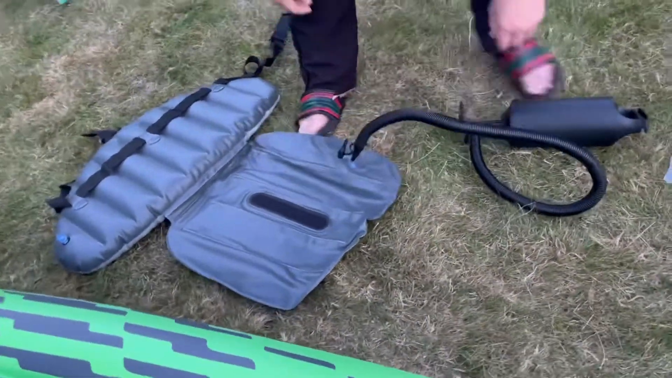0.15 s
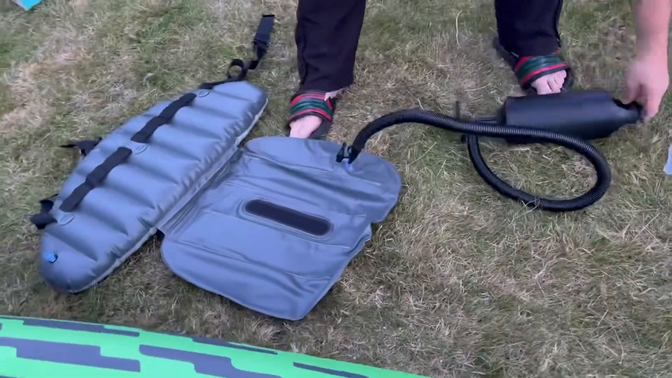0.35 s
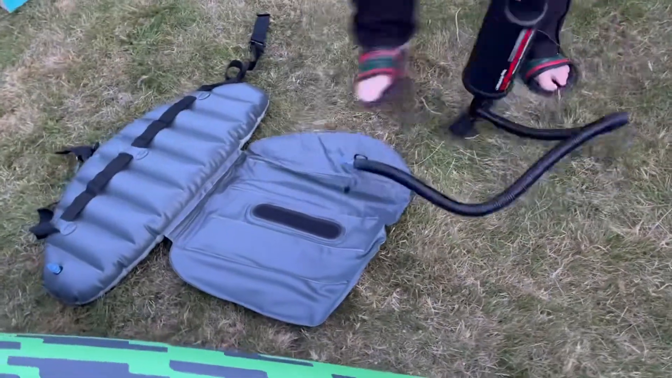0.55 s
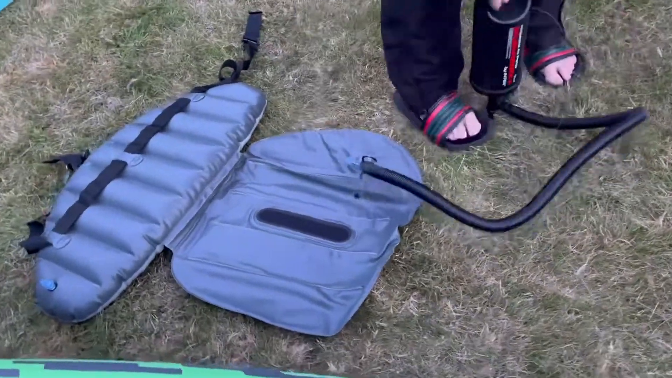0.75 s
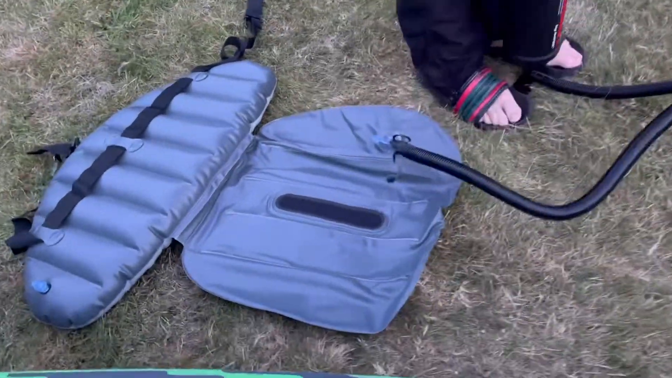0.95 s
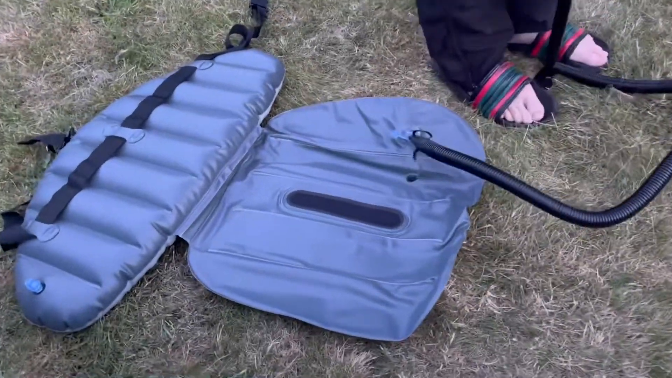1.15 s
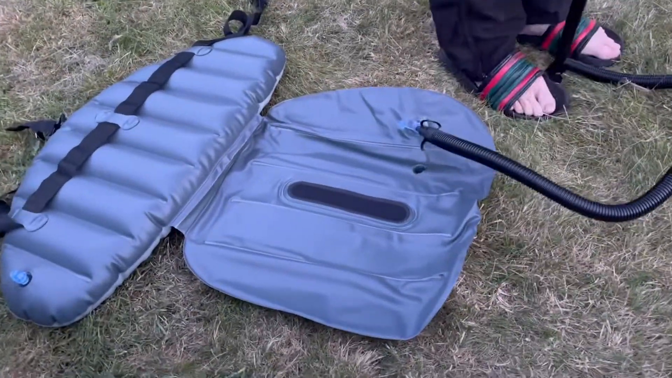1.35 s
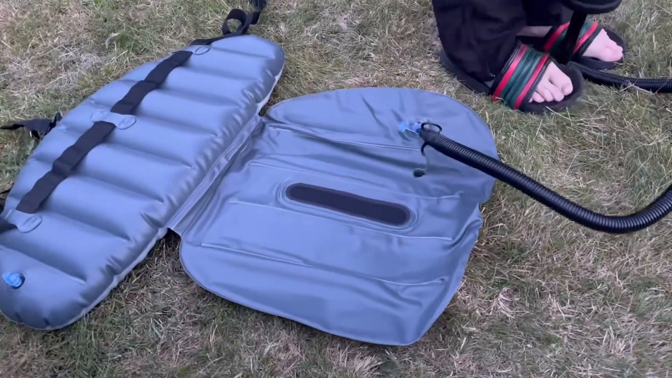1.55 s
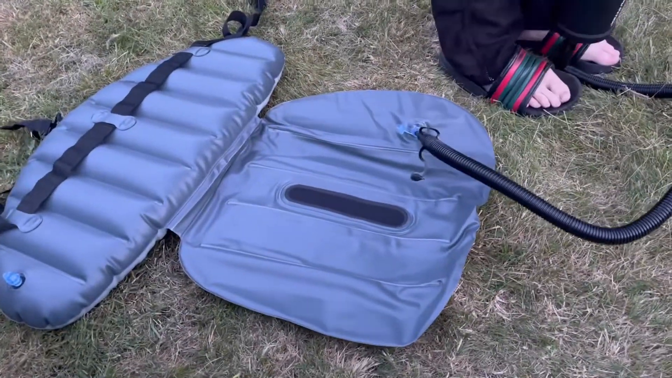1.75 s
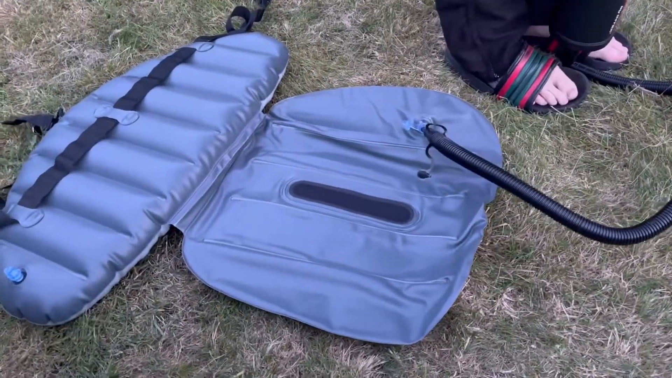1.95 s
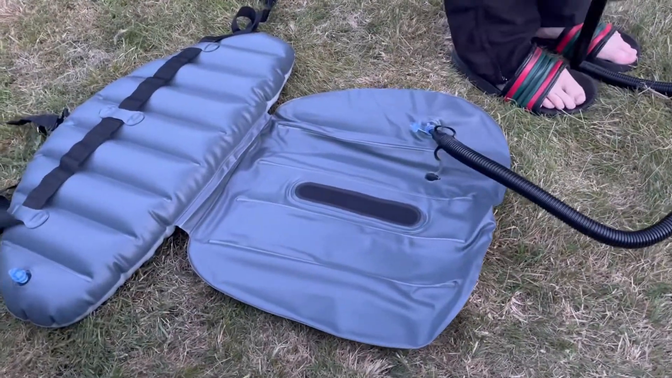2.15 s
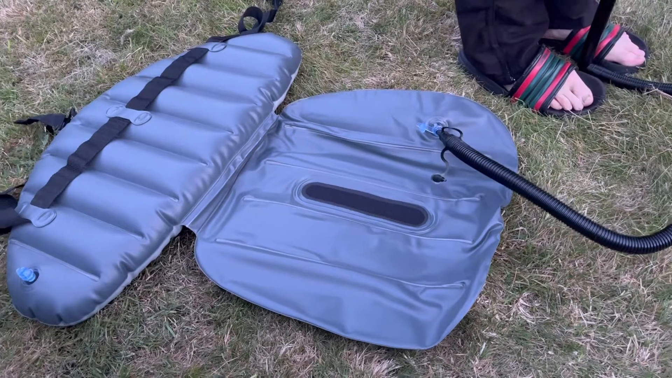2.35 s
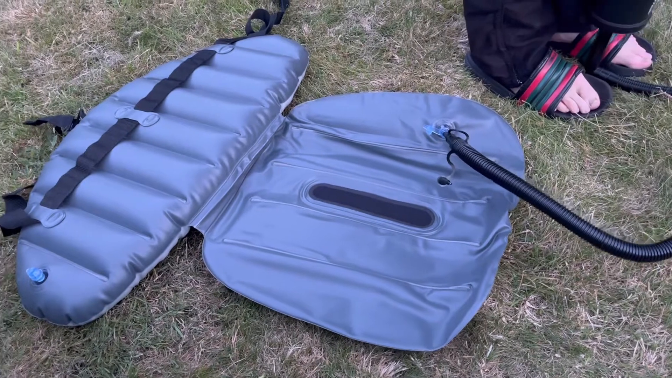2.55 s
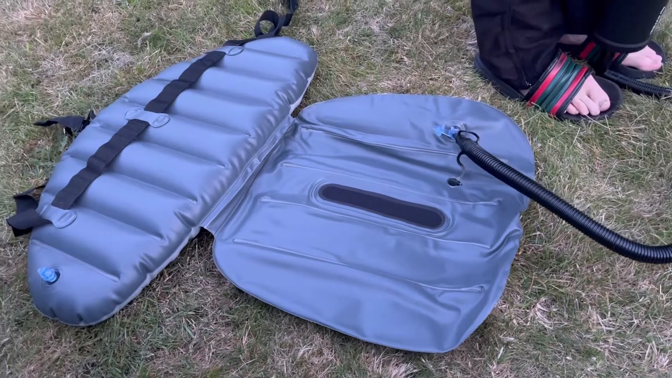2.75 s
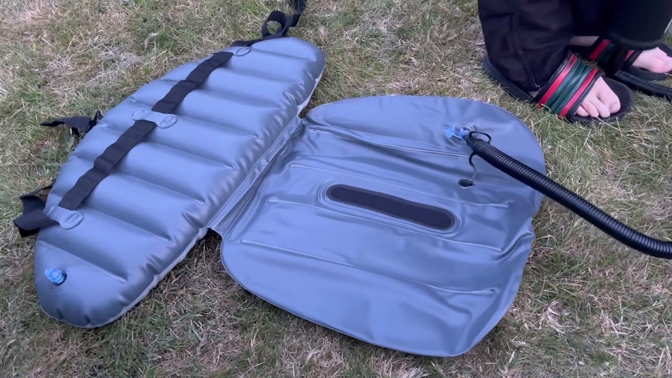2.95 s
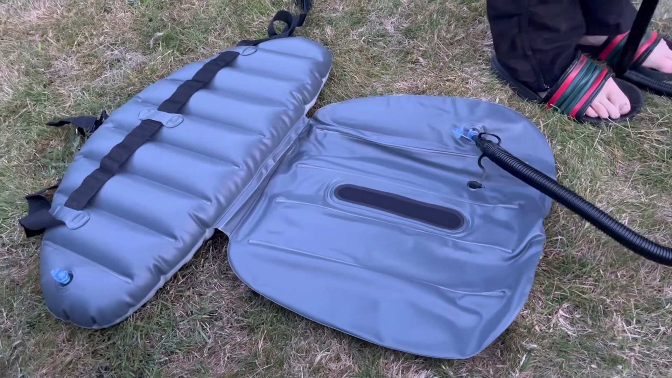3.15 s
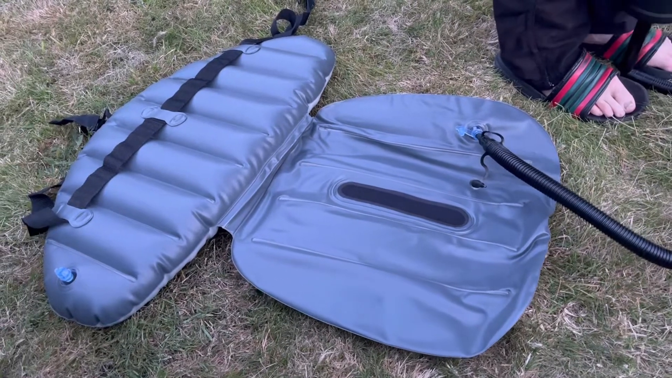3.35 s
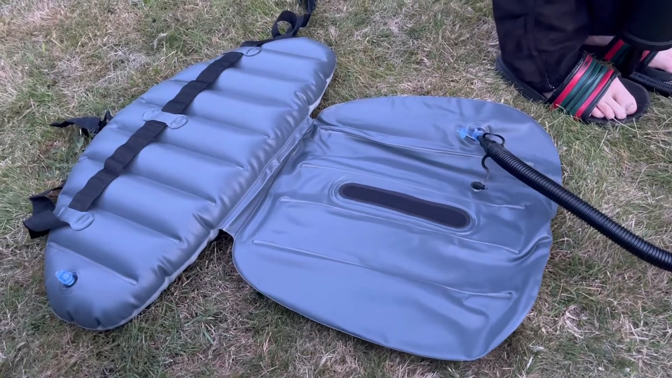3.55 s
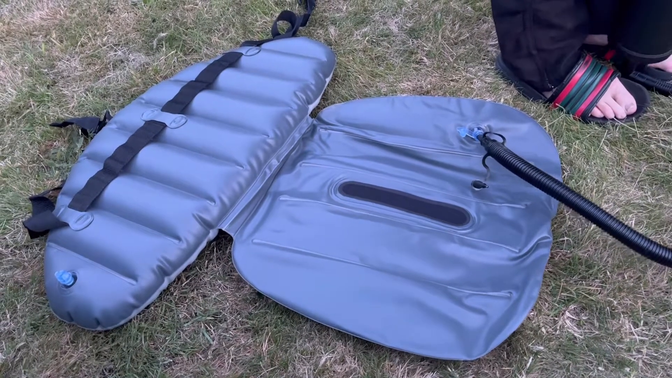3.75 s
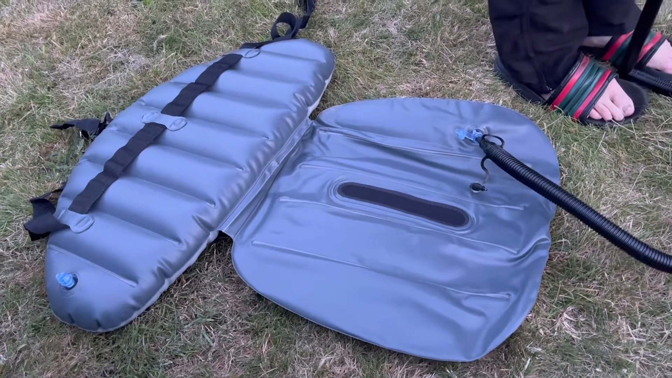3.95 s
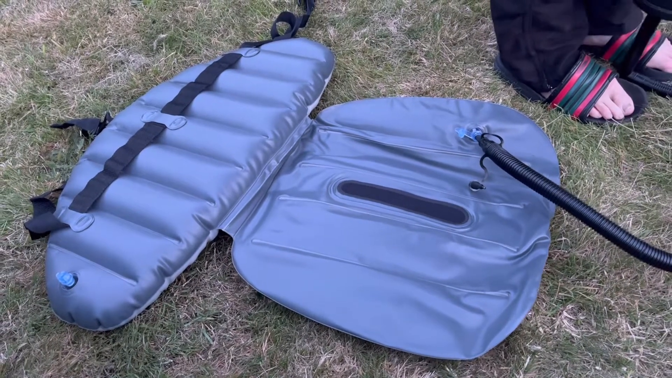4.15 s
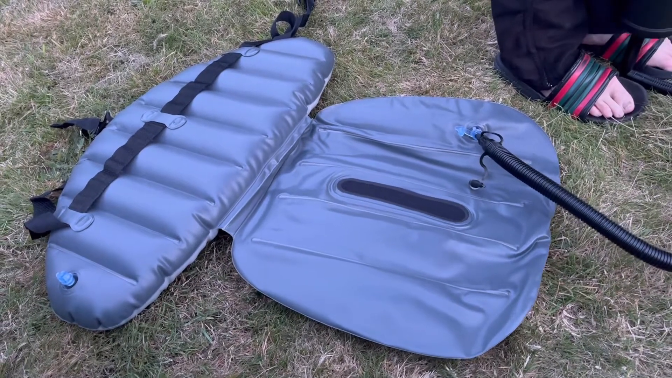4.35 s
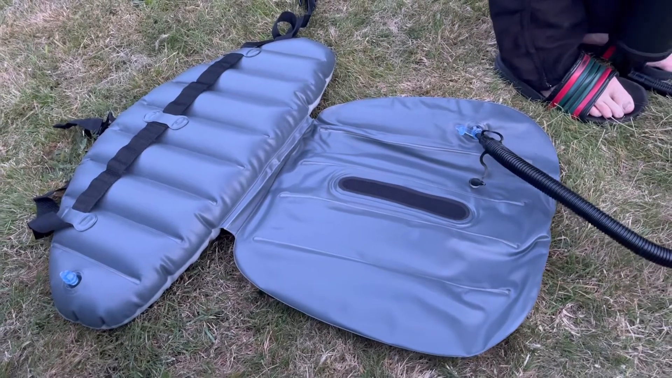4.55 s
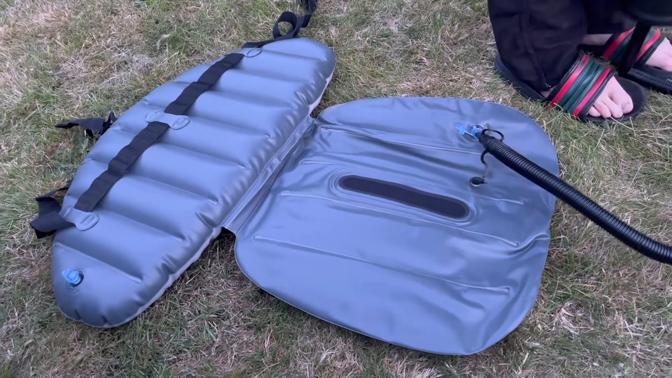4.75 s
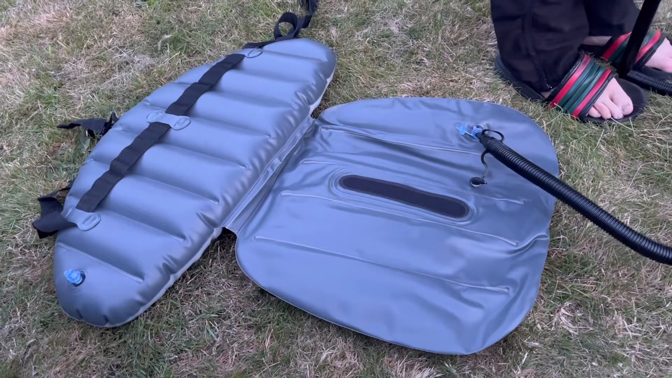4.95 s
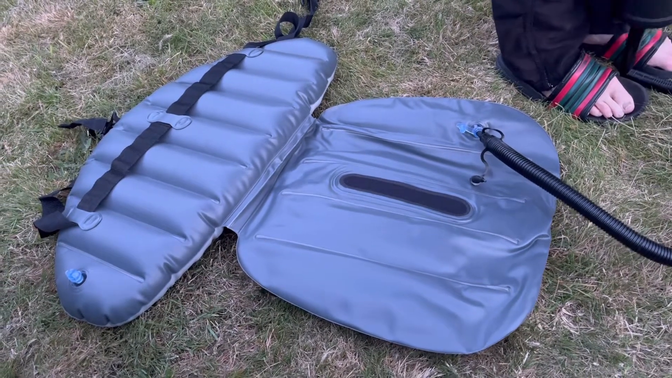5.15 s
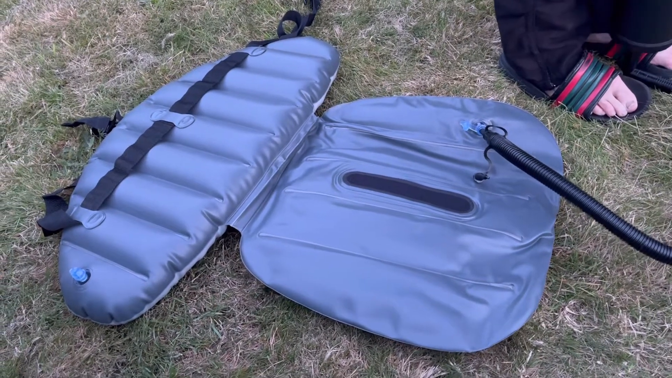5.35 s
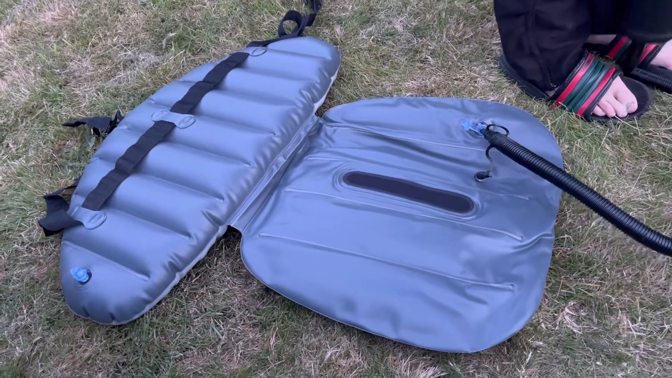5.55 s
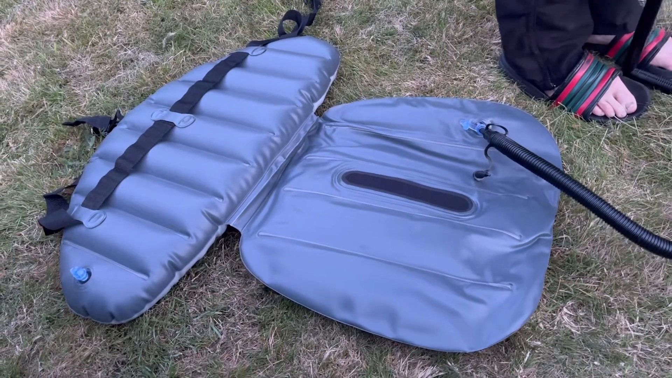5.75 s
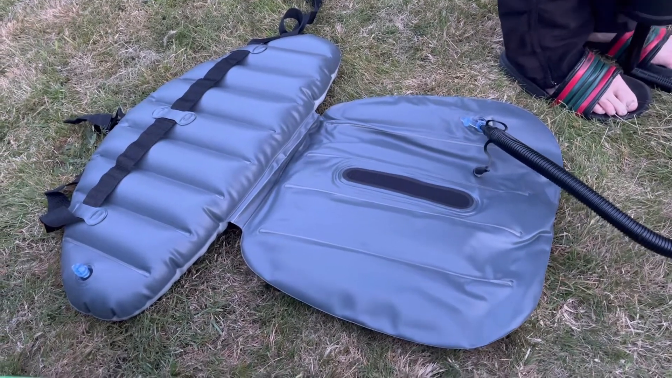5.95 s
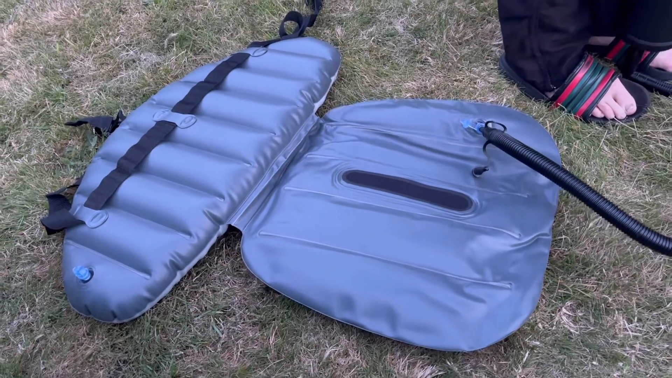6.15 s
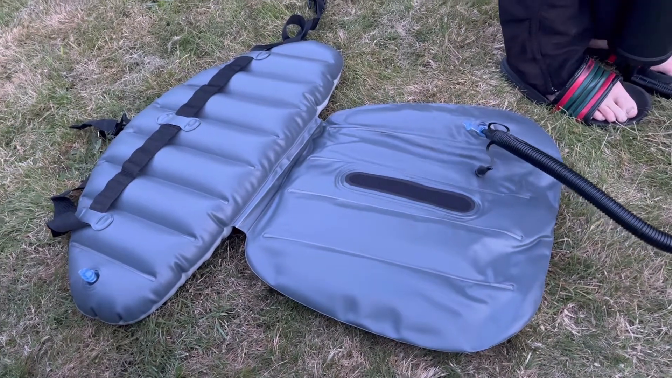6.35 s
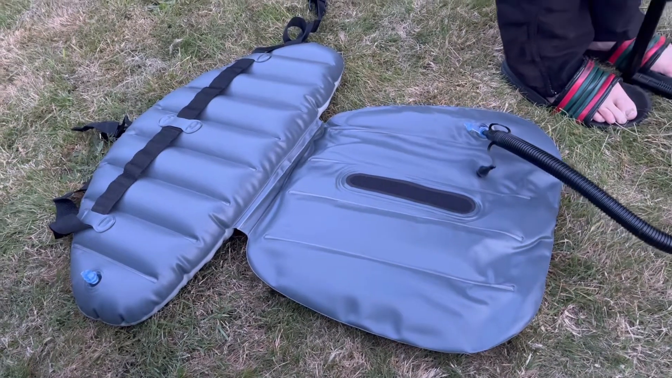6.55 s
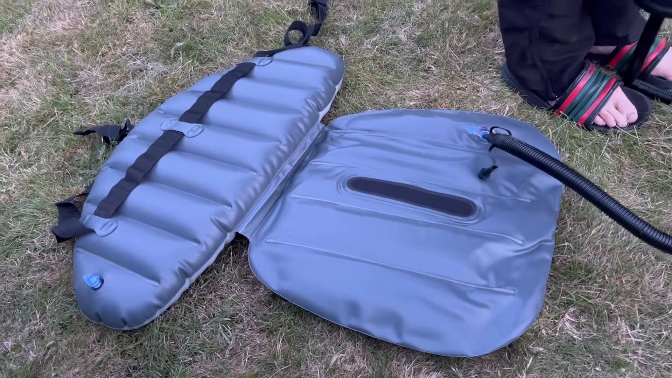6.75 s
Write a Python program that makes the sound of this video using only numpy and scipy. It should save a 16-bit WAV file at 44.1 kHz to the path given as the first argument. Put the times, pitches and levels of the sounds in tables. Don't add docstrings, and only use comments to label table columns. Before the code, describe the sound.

Outdoors on grass, a hand pump is picked up and set down with dry rustles, scuffs and hollow plastic taps. Then seven strokes follow, each a sharp valve click, a brief raspy suck of air, a knock, and a longer resonant hiss down a ribbed hose into an inflatable seat. Close microphone, with light low wind bumps and faint distant traffic.

```python
import sys
import numpy as np
from scipy import signal
from scipy.fft import rfft, irfft, next_fast_len
from scipy.io import wavfile
from scipy.ndimage import uniform_filter1d

SR = 44100
rng = np.random.default_rng(int(sys.argv[2]) if len(sys.argv) > 2 else 0)


def gain_from_decibels(decibels):
    exponent = np.asarray(decibels, float) / 20
    return 10 ** exponent


def waveform_to_disk(signal):
    frames = np.transpose(np.atleast_2d(signal))
    scaled = np.clip(frames, -1, 1) * 32767
    samples = np.round(scaled).astype(np.int16)
    wavfile.write(sys.argv[1], SR, samples)


N = 300321

# time_s, level_db, tilt_db_per_octave
GUSTS = [(0.0, -58, 2), (0.51, -55, 1.5), (1.5, -55.5, 3), (2.16, -53.5, 1.5), (2.5, -57.5, 2),
         (3.28, -54, 1), (3.57, -54, -2), (4.14, -52, 5), (4.28, -62, 0), (4.4, -62, -4), (4.59, -60, 2.5),
         (4.95, -49.5, 2.5), (5.37, -54.5, 2), (5.67, -51, -2), (5.92, -53.5, 1), (6.2, -52.5, -8),
         (6.81, -49.5, -7)]
# frequency_hz, density_db_per_hz
WIND_SPECTRUM = [(15, -61), (25, -16), (75, -5), (118, 3.5), (175, -6), (295, -17), (389, -49), (409, -44),
                 (500, -43), (650, -34), (1100, -120)]
# frequency_hz, density_db_per_hz
WASH_SPECTRUM = [(120, -31), (200, 4.5), (500, -11), (800, -8), (1200, -8.5), (1700, -13.5), (2600, -17),
                 (3300, -22), (3900, -34), (7000, -39), (11000, -34), (15900, -48)]
# loudest_s, level_db, swell_db_per_s, fade_db_per_s
SCRAPES = [(0.003, -56.5, 500, 500), (0.12, -66, 202, 98), (0.175, -53, 169, 750),
           (0.235, -71, 101.5, 111.5), (0.38, -89, 150, 103.5), (0.44, -64, 201.5, 120),
           (0.516, -63.5, 112, 400), (0.585, -86, 150, 150), (0.662, -52.5, 165, 145),
           (0.73, -69, 148, 350), (0.826, -51.5, 900, 124), (0.9, -77, 95, 117)]
# frequency_hz, density_db_per_hz
GRASS_SPECTRUM = [(1500, -4), (3000, -5), (6000, -5), (9000, -3), (13000, -5), (15900, -4)]
# start_s, peak_db, pitch_hz
SNAPS = [(0.085, -51, 8000), (0.092, -51, 3500), (0.098, -50, 3500), (0.105, -50, 9000), (0.109, -47, 5350),
         (0.112, -52, 13000), (0.142, -56, 8000), (0.1693, -45, 4800), (0.169, -50, 9500),
         (0.195, -50, 7000), (0.227, -59, 5200), (0.259, -58, 13000), (0.354, -51, 2400),
         (0.515, -54, 2600), (0.405, -50, 8500), (0.519, -55, 5500), (0.582, -56, 14000),
         (0.687, -55, 5000), (0.7134, -44, 3040), (0.714, -54, 6000), (0.813, -59, 11000),
         (0.853, -51, 14000), (0.895, -45, 4250)]
# start_s, peak_db, brightness_db, t60_s
SCUFFS = [
    (0.0867, -51, -9, 0.1),
    (0.1044, -39.5, -7, 0.048),
    (0.168, -41, -5, 0.024),
    (0.1938, -48, -9, 0.0253),
    (0.3562, -46.5, -59, 0.025),
    (0.403, -53.5, -4, 0.27),
    (0.506, -45, -4, 0.062),
    (0.7114, -44.5, -11, 0.027),
    (0.818, -50, -1.5, 0.032),
    (0.8939, -40, -34, 0.022),
]
# start_s, peak_db, brightness_db, t60_s
VENTS = [(1.219, -30, -8.5, 0.024), (1.2759, -42, -31, 0.096), (2.2534, -31, -8, 0.031),
         (2.2842, -37, -32, 0.029), (3.1487, -37.5, -16, 0.015), (3.171, -43, -25, 0.037),
         (3.9695, -31.5, -12, 0.035), (4.0315, -23.5, -19, 0.013), (4.921, -36.5, -19, 0.039),
         (5.4705, -37, -10, 0.014), (5.745, -37.5, -30, 0.034), (5.757, -35.5, -22, 0.022),
         (6.352, -37, -10, 0.016), (6.6272, -32.5, -13, 0.044), (6.6753, -41.5, -28, 0.1)]
# frequency_hz, density_db_per_hz
BURST_SPECTRUM = [(700, -1.5), (1500, -3.5), (3000, -3.5), (6000, -7.5), (9000, -7.5), (15900, -3)]
# start_s, peak_db, pitch_hz
TICKS = [(0.11, -35.5, 1036), (0.353, -39, 1240), (0.514, -46.5, 420), (0.436, -45, 600), (0.675, -47, 620),
         (0.702, -41, 523), (0.895, -45.5, 457), (1.008, -33, 900), (1.02, -43, 800), (1.934, -47, 784),
         (2.283, -50, 415), (2.401, -35, 1150), (2.874, -47.5, 770), (3.693, -49, 468), (4.036, -43, 530),
         (4.692, -39, 1250), (6.628, -36, 614)]
# start_s, click_db, click_hz, barrel_db, barrel_hz
HANDLING = [
    (0.169, -53, 600, -45.5, 248),
    (0.421, -42, 790, -44.5, 358),
    (0.661, -40.5, 446, -37.5, 150),
    (0.688, -35.5, 424, -34, 215.7),
    (0.712, -58, 426, -46, 420),
]
# start_s, peak_db, pitch_hz
BOUNCES = [
    (0.699, -37, 192),
    (1.293, -37, 176),
    (2.023, -43, 342),
    (2.302, -35, 173),
    (3.991, -37, 150),
    (4.04, -33.5, 246),
    (4.07, -33, 185),
    (4.318, -41, 226),
    (5.541, -33, 168),
    (6.416, -40, 139),
]
# start_s, click_db, click_hz, barrel_db, barrel_hz
FLAPS = [
    (0.999, -30, 1330, -36, 325),
    (2.05, -32, 1260, -36, 336),
    (2.932, -27.5, 1440, -33.5, 204),
    (3.784, -29, 1350, -43, 235),
    (4.683, -32.5, 1280, -39.5, 332),
    (5.532, -30.5, 1270, -33, 189),
    (6.409, -28.5, 1065, -40, 130),
]
# start_s, click_db, click_hz, barrel_db, barrel_hz
STOPS = [(1.219, -39.5, 710, -36.5, 232), (1.282, -56, 447, -38, 333), (2.256, -34.5, 910, -30.5, 311),
         (2.4, -27, 688, -35.5, 297), (3.171, -41, 660, -33, 235), (3.226, -39, 614, -41, 248),
         (3.971, -35, 794, -32.5, 149), (4.087, -38.5, 586, -34.5, 222), (4.919, -38.5, 450, -32, 300),
         (4.96, -39, 433, -44, 325), (5.73, -37, 350, -36, 118), (5.757, -34, 680, -33, 270),
         (5.786, -41.5, 447, -44, 117), (6.635, -34.5, 343, -33, 188), (6.688, -37.5, 850, -35, 229),
         (6.722, -44, 430, -46, 156)]
# start_s, length_s, peak_flow_db, stall_s, resonance_factor
PULLS = [
    (0.999, 0.24, -47.5, 0.042, 0.95),
    (2.052, 0.2, -46, 0.024, 0.99),
    (2.93, 0.21, -45.5, 0.081, 1),
    (3.786, 0.2, -45, 0.018, 1),
    (4.682, 0.21, -45.5, 0.063, 0.99),
    (5.532, 0.21, -44.5, 0.094, 1),
    (6.406, 0.24, -45, 0.067, 0.87),
]
PULL_LEAK_DB = (-16.5, -12.5, -8.5, -5.5, -1.5)
PULL_DRIFT = (0.903, 1.0, 0.96, 0.985, 0.86)
# frequency_hz, density_db_per_hz
PULL_AIR = [(240, -21), (400, -10.5), (561, -12.5), (741, -6), (1680, -7), (3060, -7.5), (3350, -5.5),
            (4560, -5), (8580, -12.5), (15900, -7)]
# centre_hz, width_hz, lift_db
INLET_MODES = [(1384, 89, 5.5), (1760, 140, -8.5), (2850, 230, 4.5), (3210, 114, -4), (3540, 250, 6),
               (4750, 370, 4), (5000, 3100, 2), (5600, 460, 3.5), (6740, 360, -2.5), (8200, 530, 3),
               (15100, 1800, 5)]
# start_s, peak_db, brightness_db, length_s
GASPS = [
    (1.286, -44, -7, 0.081),
    (2.307, -35.5, -4.5, 0.031),
    (3.172, -40, -5, 0.045),
    (4.926, -40.5, -10, 0.0383),
    (5.761, -36, -2.5, 0.036),
    (6.691, -36, 0, 0.045),
]
# start_s, peak_flow_db, swell_s, leak_brightness_db
PUSHES = [
    (1.4, -46.5, 0.26, 1.5),
    (2.32, -48, 0.15, -8),
    (3.19, -47.5, 0.16, -6),
    (4.05, -49.5, 0.12, -8),
    (4.94, -50, 0.2, -3.5),
    (5.8, -50, 0.24, -2.5),
    (6.73, -51, 0.12, -2.5),
]
# frequency_hz, density_db_per_hz
PUSH_AIR = [(600, -22), (1000, -49), (1700, -5), (2800, -2), (5000, -3.5), (6300, -8), (9000, -9.5),
            (12000, -13), (15900, -10)]
# time_s, pitch_hz, lift_db
SEAT = [
    (1.38, 3300, 3),
    (1.5, 2800, 6),
    (1.58, 2620, 12),
    (1.75, 2370, 25),
    (1.9, 2140, 31),
    (2.0, 1980, 23),
    (2.3, 2500, 11),
    (3.7, 2500, 6.5),
    (6.81, 2470, -6),
]
# centre_hz, width_hz, lift_db
HOSE_LIMP = [(3780, 660, 11.5), (5000, 430, 6.5), (5950, 400, -2), (7100, 1500, 12), (8700, 820, 4.5),
             (10200, 500, -2), (12500, 4500, -2.5), (13800, 300, 2), (14500, 500, -8), (15400, 400, -1)]
# centre_hz, width_hz, lift_db
HOSE_FIRST = [(3500, 200, 4.5), (4530, 1700, 10), (5500, 500, 2.5), (6100, 450, -1), (7210, 620, 9.5),
              (9000, 400, -5), (11200, 900, -5), (12700, 600, 8.5), (13450, 270, -14), (14800, 300, -11),
              (15600, 500, -1)]
# centre_hz, width_hz, lift_db
HOSE_MODES = [(3060, 160, -13), (3400, 270, 0.5), (3687, 165, -21), (4270, 560, 6.5), (7660, 240, -21),
              (8065, 300, 8)]
# centre_hz, width_hz, lift_db
BENDS = [
    [(3620, 170, -2), (5000, 305, 2), (6300, 820, -5), (7600, 220, 11), (8800, 300, -6), (9900, 370, -4),
     (11500, 300, -5), (13100, 600, 9), (14050, 350, 5), (15300, 500, 2)],
    [(5000, 305, 6), (6040, 550, -6), (7400, 200, 3), (8900, 270, -4), (10200, 300, -4), (10900, 250, 5),
     (11550, 300, -6), (12200, 250, 6), (13250, 400, 8), (15300, 900, 4)],
    [(4800, 670, 2.5), (6830, 500, -5), (9150, 300, -4.5), (10050, 550, -12), (11000, 600, 4),
     (12100, 520, 6.5), (13500, 600, 4), (14800, 250, -8), (15500, 500, 6)],
    [(3680, 190, -5), (6150, 350, 1.5), (6800, 300, -1), (9900, 640, -5), (10700, 217, 11), (11840, 700, 9),
     (13500, 620, 11), (14400, 500, -2), (15300, 500, 6)],
    [(4300, 430, -1), (4780, 150, -9), (5000, 220, 2), (6230, 200, 5), (6440, 350, -4), (9800, 570, -12),
     (10400, 500, 8.5), (10700, 220, -11), (12020, 690, 10.5), (13500, 400, 11), (14700, 200, -5),
     (15300, 400, 8)],
    [(4430, 400, -7), (5000, 240, 3), (6050, 250, 3.5), (6800, 250, -3), (9500, 250, -9), (10500, 250, 7),
     (11200, 200, 4), (11900, 250, 6), (12800, 500, 7), (13250, 250, -8), (14300, 600, 6), (15300, 400, 9)],
]
# centre_hz, width_hz, lift_db
HOSE_LAST = [(2300, 710, 4), (2700, 150, -7), (3330, 200, -13), (3500, 250, 6.5), (4430, 280, 8),
             (4850, 400, -4.5), (5350, 200, 6), (5570, 160, -1), (6860, 250, -10), (7130, 180, 13.5),
             (8000, 600, 5), (9000, 250, -7), (9150, 200, 3), (9750, 300, 8), (10200, 250, -4),
             (11000, 260, 10), (13600, 1100, 10), (15800, 300, -45)]
HOSE_MOVES_S = (1.62, 2.2, 2.62, 3.0, 3.9, 4.8, 5.65, 5.975)
HOSE_DRIFT = (0.99, 1, 0.99, 0.99, 0.98, 0.98, 0.97, 1, 0.98)
HOSE_SLACK = (0.056, .001, 0.0084, .001, .01, .0087, .0088, 0.0044, .005)
HOSE_SWAY = (-.02, -.01, .02, .005, .01, 0.016, -0.0081, .001, -.0052)
HOSE_FIRM = (0.19, 0.12, .2, .1, .1, .1, .1, .1, .1)
# start_s, peak_db, pitch_hz
BUFFETS = [(2.531, -45.5, 122), (2.694, -46, 157), (3.415, -53, 140), (3.523, -44, 165), (3.56, -44.5, 120),
           (3.632, -40, 126), (3.718, -38.5, 166), (3.757, -42, 122), (3.821, -31.5, 162),
           (3.868, -52, 125), (4.105, -38, 205), (4.14, -39.5, 154), (4.205, -33.5, 150), (4.265, -42, 141),
           (5.134, -34, 157), (5.348, -48, 143), (5.606, -43.5, 112), (5.624, -42, 140), (5.659, -42, 130),
           (5.682, -38.5, 129), (5.725, -35, 124), (5.795, -48, 122), (5.855, -33.5, 180), (5.88, -40, 127),
           (6.124, -45, 132), (6.25, -41.5, 99), (6.315, -42, 132), (6.36, -41.5, 105)]
# frequency_hz, level_db
APART_HOSE = [(1500, 1.5), (2300, -23), (3000, 2), (3700, -0.5), (4200, -15.5), (6000, -15), (6500, -1),
              (9000, -7), (10000, -6), (11800, -8), (12600, -5), (15500, 0)]
# frequency_hz, level_db
APART_REST = [(60, -20.5), (250, -19), (700, -11.5), (1500, -8), (3500, -2), (4300, -11.5), (5700, -13),
              (7000, -7), (9500, -5), (15500, -2.5)]


def evened(x):
    return x / np.sqrt(np.mean(x ** 2) + 1e-20)


def read(points, hz):
    f, value = np.transpose(points)
    return np.interp(np.log(hz + 1), np.log(f + 1), value)


def add(mix, s, sound):
    part = mix[max(round(s * SR), 0):][:len(sound)]
    part += sound[:len(part)]


def above(hz, edge_hz=8500):
    return 1 / (1 + (edge_hz / (hz + 1)) ** 8)


def resonance(hz, centre_hz, width_hz):
    return 1 / (1 + (2 * (hz - centre_hz) / width_hz) ** 2)


def band_rms(x, lo_hz, hi_hz):
    power, hz = abs(rfft(x)) ** 2, np.fft.rfftfreq(len(x), 1 / SR)
    return np.sqrt(2 * power[(hz > lo_hz) & (hz < hi_hz)].sum()) / len(x)


def hiss(length, colour_db, patchy_db, ripple_db=0, size=512):
    frames, hz = 4 * length // size + 8, np.fft.rfftfreq(size, 1 / SR)[:, None]
    a, b, patches, ripples = rng.standard_normal((frames, len(hz), 4)).T
    patches = uniform_filter1d(patches, size=4, axis=0)
    patches = evened(uniform_filter1d(patches, size=12, axis=1))
    ripples = uniform_filter1d(ripples, size=3, axis=0)
    ripples = evened(uniform_filter1d(ripples, size=100, axis=1))
    level_db = colour_db(hz, np.arange(frames) * size / 4 / SR) + patchy_db * patches
    level_db = level_db + ripple_db * (0.16 + 0.75 * above(hz, 4700)) * ripples
    spectra = (a + 1j * b) * gain_from_decibels(level_db)
    return signal.istft(spectra, nperseg=size, noverlap=3 * size // 4)[1][:length]


def rings(events, rise_turns, glide, spread, low_db, high_db):
    out, t = np.zeros(N), np.arange(SR // 9) / SR
    for (s, db, hz, t60), chance in zip(events, rng.random((len(events), 4))):
        life = np.clip(t60, .003, .1)
        shape = (1 - np.exp(-(t * hz / rise_turns) ** 2)) * gain_from_decibels(-60 * t / life)
        turns = np.cumsum(hz * (1 + glide * (np.exp(-4 * t / life) - .5))) / SR
        low_turns = turns / (1 + spread * (.5 + chance[0])) + chance[2]
        high_turns = turns * (1 + spread * (.5 + chance[1])) + chance[3]
        low = gain_from_decibels(low_db) * np.sin(2 * np.pi * low_turns)
        high = gain_from_decibels(high_db) * np.sin(2 * np.pi * high_turns)
        ring = shape * (np.sin(2 * np.pi * turns) + low + high)
        add(out, s, gain_from_decibels(db) * ring / abs(ring).max())
    return out


def bursts(events, swells):
    out, t = np.zeros(N), np.arange(SR // 6) / SR
    for s, db, bright_db, lasts in events:
        def colour_db(hz, u):
            brightness = (above(hz) - 0.2 * (1 - above(hz, 2600))) * bright_db
            gap_db = swells * 6 * resonance(hz, 14000, 2300)
            return read(BURST_SPECTRUM, hz) + brightness + gap_db + 0 * u
        x = hiss(len(t), colour_db, patchy_db=1.2, size=128)
        life = max(lasts, .004)
        if swells:
            shape = np.sin(np.pi * np.minimum(t / life, 1)) ** 0.49
        else:
            shape = (1 - np.exp(-t / (0.056 * life))) * gain_from_decibels(-60 * t / life)
        x = x / band_rms(x, 2500, 8000)
        add(out, s, gain_from_decibels(db - 14.5) * x * shape / shape.max())
    return out


def stroke(rows, air, modes, usual_db, flutter_db, ripple_db, pocket, veil, stiff,
           blur=0, sway=0, waver=0, size=512):
    s, flow_db, bright_db, drift = np.transpose(rows)
    t = np.arange(s[0], s[-1], 1 / SR)
    filling, seat_hz, seat_db = np.transpose(SEAT)
    beats = np.arange(s[0], s[-1] + .2, .06)
    tremble = 1 + waver * rng.standard_normal((len(modes), len(beats)))

    def colour_db(hz, u):
        now = s[0] + u
        moved = np.clip(np.interp(now, s, drift), .8, 1.15) - 1
        along = np.clip(u / (s[-1] - s[0]), 0, 1) - .5
        lifts = 0
        for (mode_hz, width_hz, lift_db), depth in zip(modes, tremble):
            upper = above(mode_hz)
            centre_hz = mode_hz * (1 + moved * (1 - stiff * upper) - sway * along * upper)
            lifts = lifts + lift_db * np.interp(now, beats, depth) * resonance(hz, centre_hz, width_hz)
        lifts = lifts * (1 - blur * along)
        pocket_hz = np.interp(now, filling, seat_hz)
        seat = np.interp(now, filling, seat_db) * resonance(hz, pocket_hz, 600)
        seat = seat - 9 * (1 - above(hz, 0.64 * pocket_hz))
        leak_db = np.interp(now, s, bright_db) - usual_db
        leak_share = above(hz) - veil * (above(hz, 5500) - above(hz))
        return read(air, hz) + lifts + pocket * seat + leak_share * leak_db

    x = hiss(len(t), colour_db, patchy_db=1.5, ripple_db=ripple_db, size=size)
    flutter = evened(uniform_filter1d(rng.standard_normal(len(t)), size=180))
    edges = np.clip(np.minimum((t - s[0]) / 0.0034, (s[-1] - t) / 0.0031), 0, 1)
    x = x / band_rms(x, 2000, 8000)
    return s[0], x * gain_from_decibels(np.interp(t, s, flow_db) + flutter_db * flutter) * edges


def wind():
    s, level_db, tilt_db = np.transpose(GUSTS)

    def colour_db(hz, u):
        tilt = np.interp(u, s, tilt_db) * np.log2((hz + 20) / 130)
        return read(WIND_SPECTRUM, hz) - 60 * (hz > 520) + tilt
    x = evened(hiss(N, colour_db, patchy_db=2.0, size=2048))
    lumps = uniform_filter1d(rng.standard_normal(N), size=900)
    lumps = evened(uniform_filter1d(lumps, size=900))
    return x * gain_from_decibels(np.interp(np.arange(N) / SR, s, level_db) - 1.5 + 1.7 * lumps)


def wash():
    def colour_db(hz, u):
        return read(WASH_SPECTRUM, hz) - 40 * (hz < 150) + 0 * u
    return gain_from_decibels(-59.5) * evened(hiss(N, colour_db, patchy_db=2.0, size=1024))


def rustle():
    t = np.arange(SR) / SR
    level = 0
    for s, db, swell, fade in SCRAPES:
        level = level + gain_from_decibels(db - swell * np.maximum(s - t, 0) - fade * np.maximum(t - s, 0))

    def colour_db(hz, u):
        return read(GRASS_SPECTRUM, hz) - 8 * above(hz) + 0 * u
    x = hiss(len(t), colour_db, patchy_db=3.5, size=256)
    clumps = evened(uniform_filter1d(rng.standard_normal(len(t)), size=120))
    x = x / band_rms(x, 3480, 11100) * level * gain_from_decibels(-8.0 + 2.0 * clumps)
    return np.pad(x, (0, N - len(x)))


def snaps():
    ticks = [(s, db, hz, .003 + 9 / hz) for s, db, hz in SNAPS]
    return rings(ticks, rise_turns=.6, glide=0.099, spread=0.19, low_db=-14, high_db=-8)


def scuffs_and_vents():
    return bursts(SCUFFS + VENTS, swells=False)


def knocks():
    def clicks(blows):
        return [(s, db, hz, 0.0042 + 7 / hz) for s, db, hz, *_ in blows]
    rebounds = [(s + 0.00627, db - 9, hz * 0.506) for s, db, hz, *_ in FLAPS]
    barrel = [(s, db, hz) for s, _, _, db, hz in HANDLING + FLAPS + STOPS]
    thumps = [(s, db, hz, 0.038 + 2.9 / hz) for s, db, hz in barrel + BOUNCES]
    others = clicks(HANDLING + STOPS + rebounds + TICKS)
    return (rings(clicks(FLAPS), rise_turns=1.4, glide=0.26, spread=0.44, low_db=-7.0, high_db=-15)
            + rings(others, rise_turns=1.38, glide=0.33, spread=0.41, low_db=-4.0, high_db=-7)
            + rings(thumps, rise_turns=0.69, glide=0.53, spread=0.474, low_db=-5.5, high_db=-10.5))


def pull(start, length, peak_db, stall, pitch):
    rise_s, open_s, sag_db_per_s = 0.029, 0.093, 17.5
    s = np.array([0, rise_s, open_s, length - stall, length])
    flow_db = peak_db - sag_db_per_s * (np.minimum(s, s[3]) - s[1]) + [-6, 0, 0, 0, -8.5]
    leak_db = PULL_LEAK_DB + 20 * (1 - np.float64(pitch))
    return np.transpose([start + s, flow_db, leak_db, pitch * np.array(PULL_DRIFT)])


def pulls():
    out = np.zeros(N)
    for row in PULLS:
        whistle = (4730, 370, 31 * (1 - row[-1]))
        add(out, *stroke(pull(*row), PULL_AIR, INLET_MODES + [whistle], usual_db=-6.0, flutter_db=1.0,
                         ripple_db=1.3, pocket=0, veil=0.81, stiff=.1, blur=0.87, waver=0.29))
    return out


def gasps():
    return bursts(GASPS, swells=True)


def push(start, peak_db, swell, leak_db):
    creep_s, creep_db, stall_s, stall_db = .05, -17.5, 0.086, -12
    end = min([p[0] for p in PULLS if p[0] > start], default=N / SR + 2 * stall_s)
    s = np.array([start - creep_s, start, start + swell, end - stall_s, end])
    end_db = peak_db - 37 * max(swell - 0.16, 0)
    first_db = peak_db - 6
    flow_db = first_db + creep_db, first_db, peak_db, end_db, end_db + stall_db
    return s, flow_db, leak_db + np.array([1, 1, 0, 1, 0])


def pushes():
    shift_s = .07
    out, lies = np.zeros(N), (0, *HOSE_MOVES_S, N / SR + 1)
    hoses = (HOSE_LIMP, HOSE_FIRST, *[HOSE_MODES + bends for bends in BENDS], HOSE_LAST)
    settings = list(zip(lies, lies[1:], hoses, HOSE_DRIFT, HOSE_SLACK, HOSE_SWAY, HOSE_FIRM))
    for row in PUSHES:
        s, flow_db, leak_db = push(*row)
        for since, until, hose, drift, slack, sway, firm in settings:
            u = np.clip(s, since - shift_s / 2, until + shift_s / 2)
            if u[-1] <= u[0]:
                continue
            pitch = drift - slack * (u < min(s[2], u[-1]))
            rows = np.transpose([u, np.interp(u, s, flow_db), np.interp(u, s, leak_db), pitch])
            at, x = stroke(rows, PUSH_AIR, hose, usual_db=-5.5, flutter_db=0.0, ripple_db=2.5, pocket=0.54,
                           veil=0, stiff=0.73, sway=sway, blur=-firm, waver=0.31, size=1024)
            t = at + np.arange(len(x)) / SR
            blend = np.clip(np.minimum(t - since, until - t) / shift_s + .5, 0, 1)
            add(out, at, x * np.sqrt(blend))
    return out


def buffets():
    bumps = [(s, db, hz, 0.045 + 2 / hz) for s, db, hz in BUFFETS]
    return rings(bumps, rise_turns=1.46, glide=0.14, spread=0.41, low_db=-7.5, high_db=-10)


def lawn(x, t60):
    t = np.arange(SR // 6) / SR
    taps = rng.choice([-1., 1.], len(t)) * (rng.random(len(t)) < .05)
    taps = taps * gain_from_decibels(-60 * t / t60) * (t > .002)
    return signal.oaconvolve(x, taps / np.linalg.norm(taps))[:N]


def scattered(x):
    z = signal.stft(x, nperseg=256, noverlap=192)[2]
    turned = z * np.exp(2j * np.pi * rng.random(z.shape[::-1]).T)
    y = signal.istft(turned, nperseg=256, noverlap=192)[1][:N]
    return y * np.sqrt(np.mean(x ** 2) / np.mean(y ** 2))


def scene():
    hose = pushes()
    near = pulls() + knocks() + buffets() + scuffs_and_vents() + gasps()
    echoes = gain_from_decibels(-10.5) * lawn(near + .5 * hose, t60=0.097)
    rest = near + echoes + rustle() + wind() + wash() + snaps()
    size = next_fast_len(N)
    hz = np.fft.rfftfreq(size, 1 / SR)
    apart = gain_from_decibels(read(APART_HOSE, hz)) * rfft(hose, size) + gain_from_decibels(read(APART_REST, hz)) * rfft(rest, size)
    direct = .55
    lagged = irfft((1j + .12 * above(hz, 5000)) * apart, size)[:N]
    side = np.sqrt(direct) * lagged + np.sqrt(1 - direct) * scattered(irfft(apart, size)[:N])
    return np.array([hose + rest + side, hose + rest - side])


def roll_off(x):
    return signal.sosfilt(signal.butter(12, 16790, fs=SR, output="sos"), x)


def record(dry):
    low_cut = signal.butter(3, 79.4, "high", fs=SR, output="sos")
    top_cut = signal.firwin(401, 15830, window=("kaiser", 9), fs=SR)
    mix = signal.sosfilt(low_cut, dry)
    mix = signal.oaconvolve(mix, top_cut[None], "same")
    return roll_off(mix)


dry = scene()
out = record(dry)
waveform_to_disk(out)
```